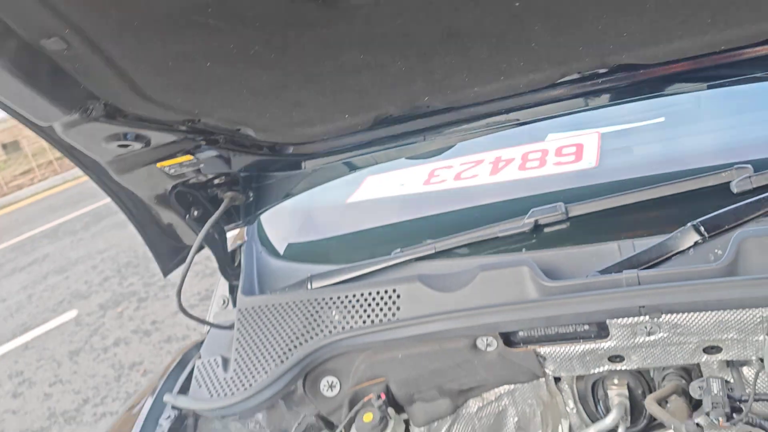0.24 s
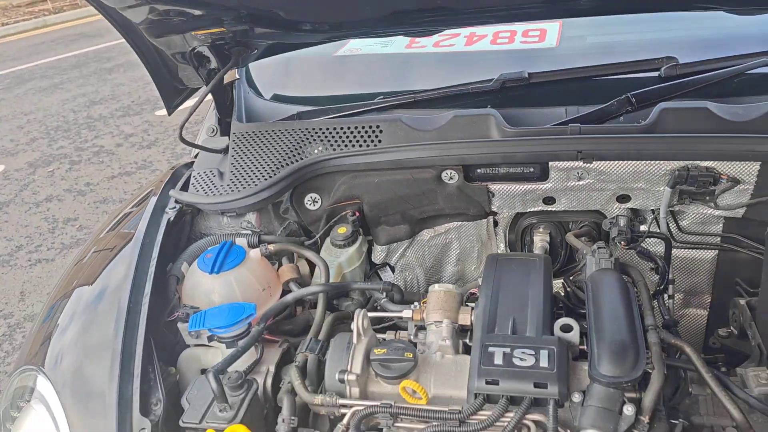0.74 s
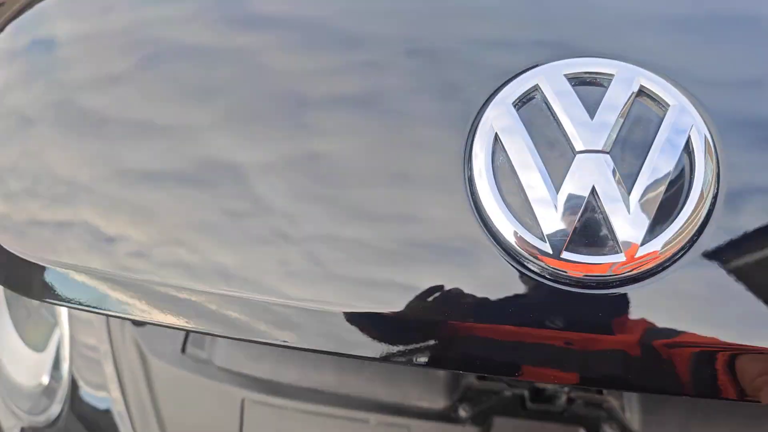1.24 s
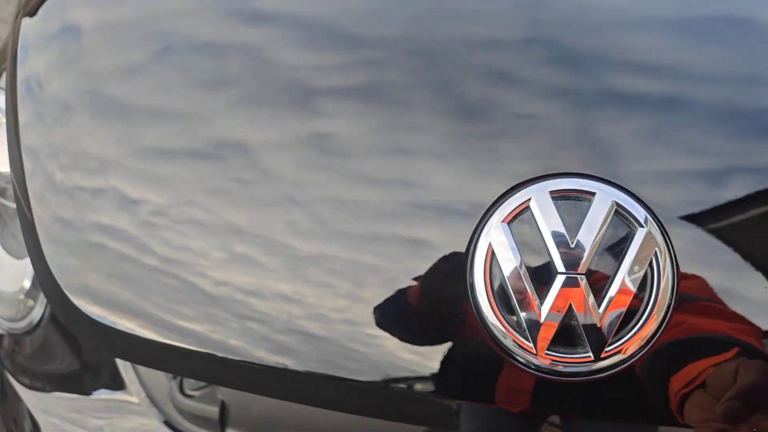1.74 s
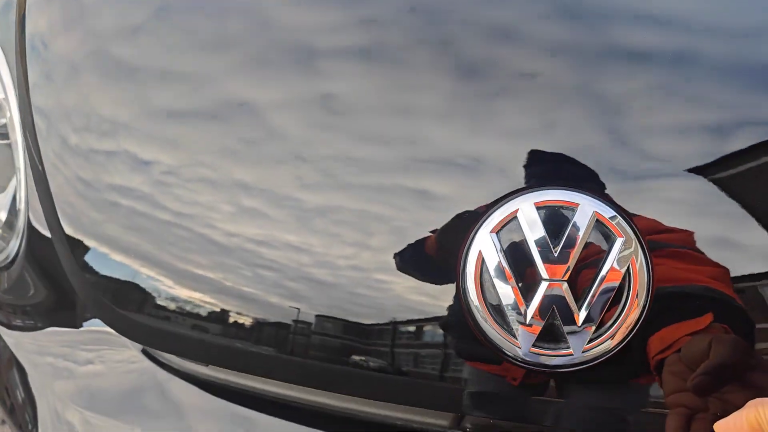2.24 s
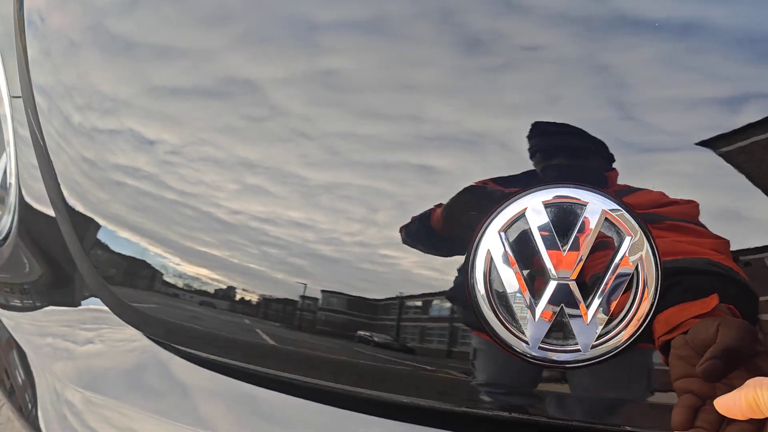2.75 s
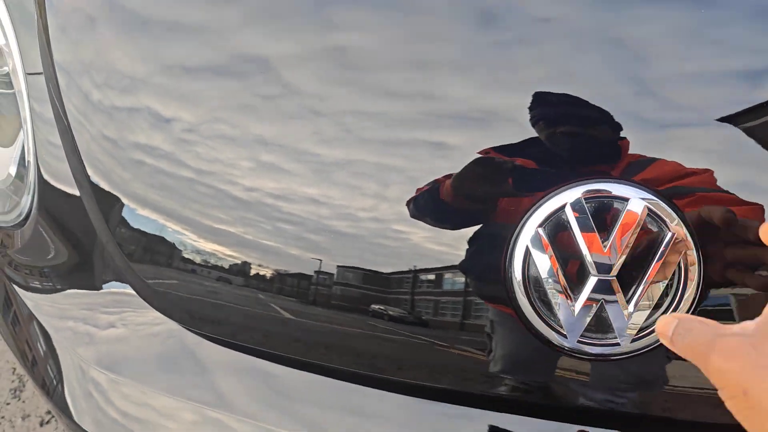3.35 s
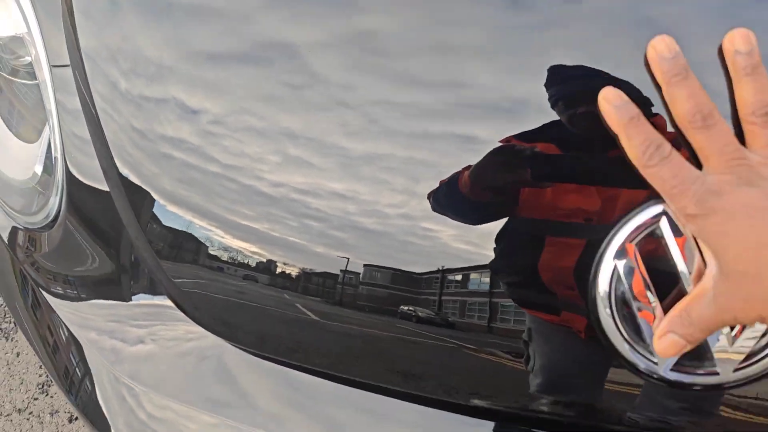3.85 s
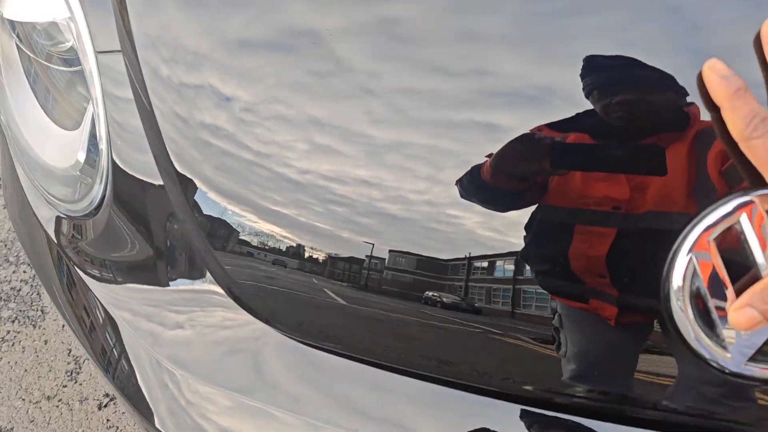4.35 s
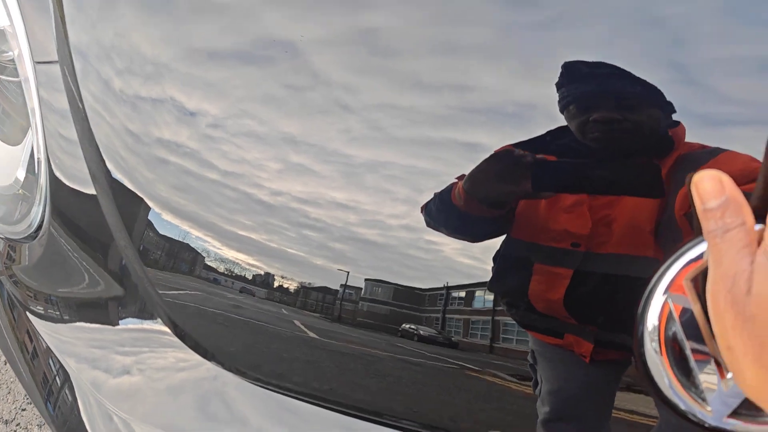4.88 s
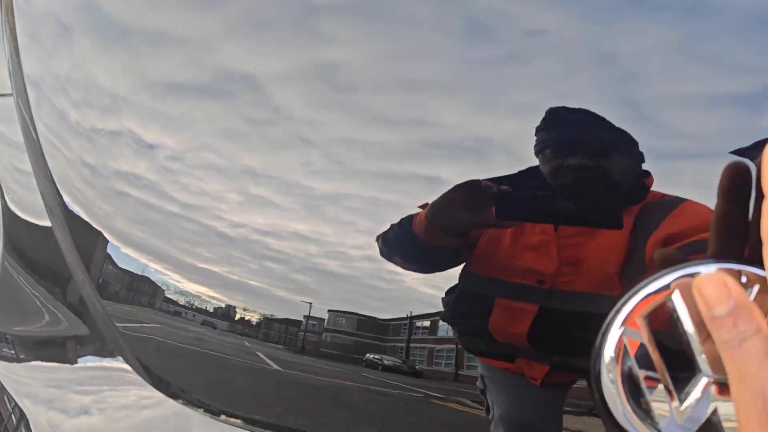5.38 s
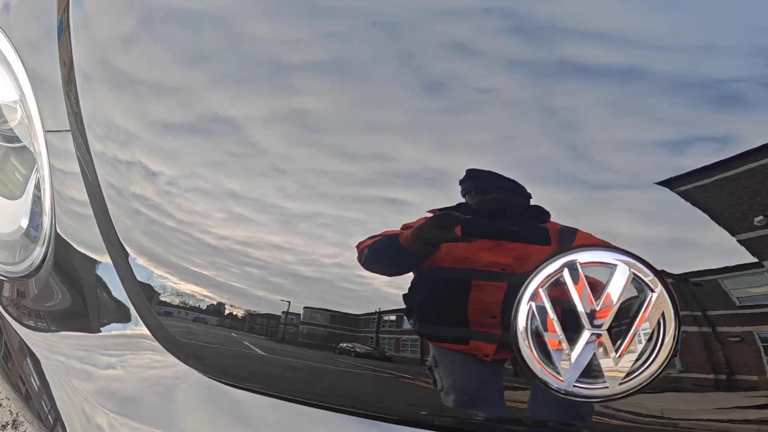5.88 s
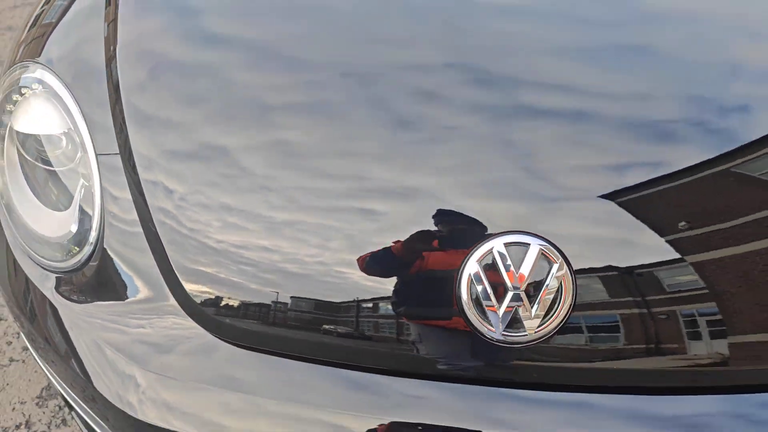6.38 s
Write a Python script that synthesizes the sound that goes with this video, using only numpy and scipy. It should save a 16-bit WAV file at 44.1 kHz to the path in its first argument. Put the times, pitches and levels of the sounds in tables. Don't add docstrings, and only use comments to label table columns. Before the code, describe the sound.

A petrol engine ticks and hisses at idle, then dulls as the bonnet comes down, slams on its catch and is pushed shut with two booming thumps.

```python
import sys
import numpy as np
from scipy import signal
from scipy.fft import rfft, irfft, next_fast_len
from scipy.io import wavfile
from scipy.ndimage import uniform_filter1d

SR = 44100
rng = np.random.default_rng(int(sys.argv[2]) if len(sys.argv) > 2 else 0)


def gain_from_db(level_db):
    decades = np.asarray(level_db, float) / 20
    return 10 ** decades


def to_wav(sig):
    pcm = np.clip(np.atleast_2d(sig), -1, 1) * 32767
    pcm = np.round(pcm).astype(np.int16)
    wavfile.write(sys.argv[1], SR, pcm.T)


N = 291942
SIZE = next_fast_len(N)
T = np.arange(N) / SR
HZ = np.fft.rfftfreq(SIZE, 1 / SR) + 1
SIDES = np.array([[1], [-1]])
FIRINGS_PER_S = 21.6


def unit(x):
    return x / np.sqrt(np.mean(x ** 2))


def follow(points):
    return np.interp(T, *np.transpose(points))


def along(points):
    hz, value = np.transpose(points)
    return np.interp(np.log(HZ), np.log(hz), value)


def high_pass(x, order, hz):
    return signal.sosfilt(signal.butter(order, hz, "high", fs=SR, output="sos"), x)


def band_pass(x, order, edges_hz):
    return signal.sosfilt(signal.butter(order, edges_hz, "band", fs=SR, output="sos"), x)


# [f/Hz, likeness 0-1]
LIKENESS = [(60, 1), (130, 0.85), (290, 0.88), (640, 0.78), (1410, 0), (3100, 0.05), (6820, 0), (15000, 0)]
# [f/Hz, left minus right level/dB]
LEAN = [(60, -5), (110, 2.5), (200, -2), (380, -3), (700, 3), (1290, 6), (2380, 5), (4400, 0.5), (8120, 0),
        (15000, 6)]


def noise():
    like = np.clip(along(LIKENESS), 0, 1)
    mid, side = rfft(rng.standard_normal((2, SIZE)))
    mid = mid * np.sqrt(1 + like)
    side = side * np.sqrt(1 - like)
    lean = gain_from_db(along(LEAN) / 2)
    return irfft(np.array([(mid + side) * lean, (mid - side) / lean]), SIZE)[:, :N] / 2


def colour(x, points):
    return unit(irfft(rfft(x, SIZE) * gain_from_db(along(points)), SIZE)[:, :N])


def ring(x, hz, width_hz):
    return signal.lfilter(*signal.iirpeak(hz, hz / width_hz, SR), x)


def walk(rate):
    k = int(SR / rate)
    steps = np.repeat(rng.standard_normal(N // k + 1), k)
    return 2.2 * uniform_filter1d(uniform_filter1d(steps, k), k)[:N]


def spell(start, full, fading, end, db):
    return gain_from_db(db) * np.interp(T, np.sort([start, full, fading, end]), [0, 1, 1, 0])


def ports(x):
    return np.array([np.roll(x, 7), x])


def struck(modes, t, factor, push_s):
    hz, db, t60 = np.transpose(modes)[:, :, None]
    loudness, pitch, phase = rng.standard_normal((3, len(modes), 1))
    fade = gain_from_db(db + 2.53 * loudness - 60 * t / (t60 * factor))
    tone = fade * np.sin(2 * np.pi * hz * (1 + 0.0084 * pitch) * t + 0.5 * phase)
    sound = tone.sum(axis=0) * (1 - np.exp(-(t / push_s) ** 2))
    return -sound / np.abs(sound).max()


# [f/Hz, level/dB per Hz]
ROAD_COLOUR = [(15, -67), (25, -9), (60, -21), (91, -8), (163, -7.5), (261, -3.5), (348, -15.5), (437, -17),
               (549, 1.5), (768, -7.5), (841, -7.5), (908, -5.5), (950, -13.5), (1240, -41), (2090, -120)]
# [t/s, level/dB]
LULL = [(0, 2.5), (0.3, 2.5), (0.72, -4), (1.2, -0.5), (1.66, -5.5), (2.1, -2.5), (2.5, -2.5), (3.5, -10),
        (3.9, -9), (4.9, -14), (5.86, -13), (6.25, -20.5), (6.62, -16.5)]
# [level/dB, share of the lull, swell/dB]
ROAD = [
    (-55.5, 0.3, 0.9),
    (-49, 1.05, 0.7),
    (-50, 0.8, 0.7),
]


def traffic():
    lull_db = follow(LULL)
    wash = colour(noise(), ROAD_COLOUR)
    out = 0
    for edges_hz, (db, share, swell_db) in zip([(20, 140), (140, 420), (420, 900)], ROAD):
        band = unit(band_pass(wash, 3, edges_hz))
        out = out + band * gain_from_db(db + share * lull_db + swell_db * walk(4) + 3.0 + 0.8 * walk(11))
    pan_db = -0.5 + 1.2 * walk(3.23)
    return out * gain_from_db(pan_db / 2 * SIDES)


# [f/Hz, level/dB per Hz]
BAY_OPEN = [(470, -25), (800, -5.5), (895, -35), (988, -2), (1820, -8), (2110, -9.5), (2570, -8.5),
            (4080, -7), (6950, -11), (7880, -9), (9730, -13), (12900, -7), (15600, -17.5)]
# [f/Hz, level/dB per Hz]
BAY_SHUT = [(470, -41), (800, -41), (988, 4), (1820, -1), (2010, 1), (3640, -18.5), (4340, -16),
            (5490, -27), (7880, -25), (9610, -34), (10900, -29), (12800, -29.5), (15600, -30)]
# [f/Hz, width/Hz, open level/dB, shut level/dB]
DUCTS = [(521, 34, -20.5, -5.5), (1289, 14, -21.5, -16), (1750, 160, -21, -34.5), (2055, 220, -39, -10),
         (2423, 16, -14, -12), (3035, 460, -12.5, -6.5)]


def hiss(firings, gap, shade_db, tick_db):
    air = noise()
    rush = gap * colour(air, BAY_OPEN) + (1 - gap) * colour(air, BAY_SHUT)
    body = signal.sosfiltfilt(signal.butter(3, 3500, fs=SR, output="sos"), rush)
    fizz = rush - body
    fizz = fizz / np.sqrt(uniform_filter1d(np.mean(fizz ** 2, axis=0), SR // 4))
    body = body / np.sqrt(uniform_filter1d(np.mean(body ** 2, axis=0), SR // 4))
    fizz = fizz * gain_from_db(1.3 * np.cos(2 * np.pi * (firings - .12)) + 2.3 * walk(110) - 0.6)
    for hz, width_hz, open_db, shut_db in DUCTS:
        duct_db = shut_db + gap * (open_db - shut_db) + 2.2 * walk(6)
        body = body + gain_from_db(duct_db) * unit(ring(noise(), hz, width_hz))
    leak_db = -51.5 + np.where(T > 5.28, -6, 0) + 1.14 * walk(3.586)
    loud = np.hypot(gain_from_db(-38.5 + shade_db), gain_from_db(leak_db))
    pulse_db = 0.84 * walk(13) + 0.5 * np.cos(2 * np.pi * (firings - .42))
    return body * loud * gain_from_db(pulse_db) + fizz * gain_from_db(tick_db - 2.2)


# [start t/s, full t/s, fading t/s, end t/s, level/dB]
WHINES = [
    (0.06, 0.19, 0.95, 1.16, -31.5),
    (0.38, 0.477, 0.42, 1.1, -34.5),
    (1.217, 1.297, 1.33, 1.46, -39),
    (4.203, 4.367, 5.2, 5.3, -54),
]


def belt_whine(gap):
    whine_hz = 983
    song = gain_from_db(-56.5 + 1.5 * walk(5)) + sum(spell(*row) for row in WHINES)
    rough = unit(ring(ring(noise(), whine_hz, 75), whine_hz, 85))
    glide_hz = whine_hz + 40 * gap * np.clip(.95 - T, 0, 1) + 11 * walk(70)
    tone = np.sin(2 * np.pi * np.cumsum(glide_hz) / SR) * gain_from_db(0.8 + 1.5 * walk(25)) * gain_from_db(3.0 * SIDES)
    return (0.8 * rough + 1.5 * tone) * song * gain_from_db(-14.5)


# [part of the cycle, f/Hz, width/Hz, open level/dB, shut level/dB, t60/s, scatter/dB]
TICKS = [(0.868, 4170, 550, 6.5, 6, 0.04, 1.5), (0.873, 4480, 220, 2, 2, 0.038, -0.5),
         (0.845, 8800, 15500, 8, -6, 0.013, 1), (0.018, 7900, 1200, 1, -17, 0.023, 8.5),
         (0.205, 6270, 930, 4.5, -2, 0.054, 3), (0.224, 7920, 530, 2, -3, 0.026, 2),
         (0.202, 7800, 8200, 8, -12, 0.0094, 5), (0.34, 11950, 1900, 4.5, -5.5, 0.028, 3.5),
         (0.97, 8000, 16500, 6.5, -9, 0.014, 0), (0.47, 2010, 300, -3.5, 0.5, 0.092, 5),
         (0.438, 3390, 930, 1, -0.5, 0.046, 4)]
CYLINDER_DB = [0, 0.14, 0.56, 0.95]


def ticks(firings, gap):
    out = 0
    for place, hz, width_hz, open_db, shut_db, t60, scatter_db in TICKS:
        turn = firings + .016 * walk(25) - place + 4
        cycle = turn.astype(int)
        since = turn % 1 / FIRINGS_PER_S
        luck = np.clip(rng.standard_normal(200), -1.6, 1.0)[cycle]
        size_db = np.clip(scatter_db, 1, 3.5) * luck + np.array(CYLINDER_DB)[cycle % 4]
        metal = unit(ring(noise(), hz, width_hz))
        metal = metal / (uniform_filter1d(metal ** 2, int(SR / width_hz / 2) + 9) + .05) ** .4
        rise = 1 - np.exp(-since / (0.00022 + 0.68 / width_hz))
        burst = gain_from_db(size_db - 60 * since / t60) * rise * metal
        out = out + gain_from_db(shut_db + gap * (open_db - shut_db)) * unit(ring(burst, hz, 1.32 * width_hz))
    return out


# [part of the cycle, f/Hz, width/Hz, open level/dB, shut level/dB, length/s,
# every second firing level/dB]
COVERS = [
    (.23, 2180, 80, 4.5, 5.5, .026, -3),
    (.33, 1290, 60, 1, 7.5, .03, -9),
    (.3, 2450, 35, -7, -2, .036, -2.5),
]
# [f/Hz, from t/s, to t/s, gained level/dB]
GLIMPSES = [(2180, .08, .4, 2), (2180, .62, 1.05, 2.5), (2180, 1.65, 2.1, 7), (2180, 3.6, 4.0, 8),
            (1290, 0.0, .2, 4), (1290, .7, .97, 4), (1290, 1.3, 2.3, 4), (2450, 0.0, .25, 7),
            (2450, 1.22, 1.62, 11), (2450, 2.1, 2.4, 7), (2450, 4.4, 5.15, 6), (2450, 5.5, 5.7, 10),
            (2450, 6.5, 6.7, 12)]


def covers(firings, gap):
    out = 0
    for place, hz, width_hz, open_db, shut_db, length_s, odd_db in COVERS:
        turn = firings - place + 4
        cycle = turn.astype(int)
        since = turn % 1 / FIRINGS_PER_S
        size_db = odd_db * (cycle % 2) + rng.standard_normal(200)[cycle] + 0.8 * walk(3)
        seen = 1
        for cover_hz, a, b, db in GLIMPSES:
            if abs(cover_hz / hz - 1) < .05:
                seen = seen + spell(a - .05, a, b, b + .05, db) * (1 - gain_from_db(-db))
        gate = gain_from_db(size_db) * np.interp(since, [0, .002, length_s, length_s + .006], [0, 1, .6, 0])
        metal = unit(ring(noise(), hz, width_hz))
        metal = metal / (uniform_filter1d(metal ** 2, int(SR / width_hz / 2)) + .05) ** .45
        hum = unit(ring(gate * metal, hz, 2.45 * width_hz))
        out = out + gain_from_db(shut_db + gap * (open_db - shut_db)) * seen * hum
    return out


# [t/s, firings so far]
CRANK = [(0.0, 0.44), (0.6, 13.42), (1.8, 39.2), (2.55, 55.46), (3.3, 71.56), (4.8, 104.03), (5.4, 117.12),
         (6.62, 143.44)]
# [t/s, gap 0-1]
OPENING = [
    (0, 1),
    (1.0, 1),
    (1.3, 0.49),
    (1.6, 0.77),
    (2.5, 0.2),
    (3.1, 0.01),
    (6.62, 0.01),
]
# [t/s, level/dB]
SHADE = [(0, 0.95), (0.45, 1.3), (0.75, 1), (1.06, -1), (1.25, -6.5), (1.4, -12.5), (1.57, -15.5),
         (2.1, -18.5), (2.5, -18), (3.2, -21.5), (3.6, -19), (4.3, -23.5), (6.62, -21.5)]


def engine():
    shade_db = follow(SHADE)
    tick_db = -36.5 + shade_db
    gap = np.clip(follow(OPENING), 0, 1)
    firings = follow(CRANK)
    clatter = (ticks(firings, gap) + covers(firings, gap)) * gain_from_db(tick_db - 11.0)
    return hiss(firings, gap, shade_db, tick_db) + clatter + belt_whine(gap)


# [start t/s, full t/s, fading t/s, end t/s, level/dB]
SLEEVE = (5.77, 5.81, 5.9, 6.05, -51.5)
# [f/Hz, level/dB per Hz]
CLOTH = [(1470, -21), (2500, 2), (4270, -2), (5060, -1), (5630, 3), (8390, -6.5), (12900, 1), (15600, -3)]
# [start t/s, full t/s, fading t/s, end t/s, level/dB]
PALM = [
    (3.28, 3.39, 3.41, 3.45, -68),
    (3.5, 3.58, 3.6, 3.8, -64),
    (5.3, 5.36, 5.37, 5.41, -68),
    (5.57, 5.66, 5.71, 5.77, -59.5),
]


def sleeve_and_palm():
    cloth = colour(noise(), CLOTH) * uniform_filter1d(spell(*SLEEVE), 900)
    slide = uniform_filter1d(sum(spell(*row) for row in PALM), 900)
    skin = unit(ring(ring(noise(), 14000, 4000), 11000, 6300)) * slide * gain_from_db(3.5)
    return (cloth + skin) * gain_from_db(2.0 + 1.56 * walk(40))


# [t/s, pin level/dB, hook level/dB]
RAPS = [(2.5655, -44, -31), (2.9795, -27, -18), (2.9897, -20, -22), (3.0, -21, -17), (3.0044, -13, -2),
        (3.01, -3.5, -41), (3.0184, -14, -10), (3.031, -8, -30), (3.045, -24, -40), (3.054, -17, -40),
        (3.0707, -29, -42), (4.043, -30, -43), (4.0554, -13.5, -10), (4.0704, -20, -5), (4.075, -24, -30),
        (4.0935, -31, -25), (4.1164, -32, -27.5), (4.4341, -40, -54), (5.229, -28, -13.5),
        (5.2452, -14.5, -24), (5.2585, -15, -34), (5.269, -23, -45), (5.294, -23.5, -37), (2.572, -47, -34),
        (2.885, -45, -29), (5.343, -44, -40)]
# [f/Hz, level/dB, t60/s]
PIN = [(1490, -4, 0.055), (1543, 4, 0.047), (1685, -4, 0.056), (1883, -6.5, 0.042), (2400, -27, 0.025)]
# [f/Hz, level/dB, t60/s]
HOOK = [(777, 1.5, 0.052), (826, -8, 0.11)]


def catch():
    out = np.zeros((2, N))
    t = np.arange(4000) / SR
    for s, pin_db, hook_db in RAPS:
        pin = ports(struck(PIN, t, 0.94, 0.0033)) * gain_from_db(pin_db - 4.5 + 9 / 2 * SIDES)
        hook = ports(struck(HOOK, t, 1.0, 0.00039)) * gain_from_db(hook_db - 5.0 - 1.5 / 2 * SIDES)
        out[:, int(s * SR):int(s * SR) + len(t)] += pin + hook
    return out


# [t/s, boom level/dB, knock level/dB, ring time factor, boom tilt/dB per octave]
BLOWS = [(2.565, -8.5, -19, 0.65, -2), (2.623, -31, -32.5, 0.7, 15), (2.697, -28, -45, 1, -9),
         (2.843, -29, -41, 0.86, -0.5), (2.885, -26.5, -32, 1, 7), (2.969, -24.5, -27, 0.51, 10),
         (2.99, -10, -14, 0.56, -0.5), (3.002, -13, -7, 0.28, 4), (3.02, -24, -19, 0.91, 1.3),
         (3.03, -13.5, -14, 0.9, 7.5), (3.047, -36, -15.5, 0.41, -9), (3.084, -24.5, -27, 0.37, 12),
         (3.1106, -25, -21.5, 0.25, -1), (3.158, -31, -33, 0.3, 2), (4.054, -6, -18.5, 0.54, -3),
         (4.071, -5, -15.5, 0.47, 1.5), (4.101, -8, -20, 0.46, -1), (4.136, -16.5, -25, 0.59, 6.5),
         (4.169, -17, -57, 0.92, -1.5), (4.36, -17.5, -45.5, 0.45, 0.3), (4.426, -21.5, -36, 0.9, 0.5),
         (5.203, -14, -30.5, 0.59, 7), (5.229, -1.5, -22.5, 0.59, 1.1), (5.242, -12.5, -12.5, 0.78, 2),
         (5.262, -11, -16, 0.83, -1.5), (5.294, -10, -20.5, 0.71, 2.5), (5.341, -17, -22, 0.24, 6),
         (5.428, -25.5, -58, 0.74, -1.5), (5.56, -36, -93, 0.43, -9), (5.891, -35.5, -41.5, 0.37, 17.5)]
# [f/Hz, level/dB, t60/s]
PANEL = [(62, -5, 0.14), (85.3, 3, 0.43), (98.7, -1.5, 0.64), (122, -2, 0.74), (148, -13, 1),
         (164.1, 4, 0.37), (172.7, 1, 0.47), (186, 0, 0.46), (240.4, -8.5, 0.5), (278.7, -5.5, 0.42),
         (321.8, -7.5, 0.33), (363.7, -2.5, 0.22), (411.3, -12.5, 0.28), (170.6, -2.5, 0.11),
         (257, 5.5, 0.02)]
# [f/Hz, level/dB, t60/s]
FRAME = [(424, -3, 0.33), (495.8, -1.5, 0.33), (549.6, -3, 0.34), (597, -0.5, 0.23), (707, 1.5, 0.13),
         (756.6, -8.5, 0.24), (873, -13.5, 0.22), (970, -28, 0.05), (1082, -13, 0.11), (1187, -10, 0.21),
         (1378, -7.5, 0.12), (1730, -21, 0.32), (2120, -7.5, 0.036)]


def blows(seams, latch, t):
    out = np.zeros((2, N + SR))
    snap = (1 - np.exp(-t / 0.00022)) * (gain_from_db(-60 * t / 0.036) + gain_from_db(-8.0 - 60 * t / 0.068))
    for s, boom_db, knock_db, factor, tilt_db in BLOWS:
        span = slice(int(s * SR), int(s * SR) + len(t))
        panel = [(hz, db + tilt_db * np.log2(hz / 170), t60) for hz, db, t60 in PANEL]
        boom = struck(panel, t, factor, 0.0025) * gain_from_db(boom_db - 1.84)
        boom = boom + 0.051 * np.roll(boom, SR // 250) * SIDES
        knock = 0.58 * struck(FRAME, t, factor, 0.0021) + 0.15 * struck(FRAME, t, factor, 0.0013) * SIDES
        rattle = seams[:, span] * gain_from_db(-9.5 - 60 * t / (0.12 * factor)) * (1 - np.exp(-t / 0.00074))
        crack = latch[:, span] * snap * gain_from_db(knock_db - 34)
        pan_db = -2 + rng.standard_normal()
        out[:, span] += (boom + (knock + rattle) * gain_from_db(knock_db + 3.0) + crack) * gain_from_db(pan_db / 2 * SIDES)
    return out


# [t/s, level/dB, f/Hz of the ringing part, treble level/dB, t60/s]
CRACKS = [(2.5651, -19.5, 3960, 0, 0.037), (2.571, -32, 2400, -13, 0.038), (2.9785, -38, 2600, -20, .05),
          (2.989, -20, 2420, -1, 0.032), (2.9995, -25, 5200, 0, .05), (3.004, -19.5, 2900, -1, .04),
          (3.0096, -15, 5800, -1, .04), (3.0198, -19, 3970, -3, 0.04), (3.0295, -25, 2700, 2, 0.025),
          (3.0323, -19, 5760, 5.5, 0.033), (3.043, -22, 2550, -16, 0.049), (3.054, -20.5, 2300, -2, 0.022),
          (3.061, -28.5, 2530, -23, 0.047), (3.0707, -38, 2100, -26, 0.051), (3.11, -42, 2200, -12, .03),
          (4.0552, -40, 3000, -8, .05), (4.071, -33.5, 2300, 2, 0.033), (4.0741, -42, 2550, -8, .06),
          (4.083, -44, 1900, -18, 0.069), (4.0935, -45, 2720, -14, 0.069), (4.1164, -47, 1800, -10, 0.045),
          (4.135, -48, 1650, -16, .06), (5.229, -33, 6200, -2, .03), (5.24, -27, 2580, -21, 0.035),
          (5.2463, -18, 2180, -26, 0.044), (5.254, -28, 2400, 4, .02), (5.259, -12, 6630, 5.5, 0.022),
          (5.2616, -20, 2940, 1, 0.031), (5.27, -25, 2860, -16, .04), (5.2775, -32, 3040, -17, 0.091),
          (5.294, -35, 2820, -10, 0.069), (5.343, -43, 2500, -10, .04), (5.427, -41, 4400, -8, .02),
          (5.665, -42, 2400, -12, .02)]


def cracks(latch, t):
    out = np.zeros((2, N + SR))
    treble = signal.sosfiltfilt(signal.butter(2, 5000, "high", fs=SR, output="sos"), latch)
    for s, crack_db, hz, treble_db, t60 in CRACKS:
        span = slice(int(s * SR), int(s * SR) + len(t))
        part = 1.5 * gain_from_db(-9) * ports(np.sin(2 * np.pi * hz * t))
        fade = (1 - np.exp(-t / 0.00018)) * (gain_from_db(-60 * t / t60) + gain_from_db(-17 - 60 * t / (1.8 * t60)))
        grit = latch[:, span] + (gain_from_db(treble_db) - 1) * treble[:, span]
        out[:, span] += (grit + part) * fade * gain_from_db(crack_db - 1.5)
    return out


# [f/Hz, width/Hz, level/dB]
LATCH = [(2160, 1060, 17.5), (2750, 330, -5.5), (4300, 1700, 1), (5820, 200, 3.5), (7350, 200, -4.5),
         (11200, 5900, -2.5)]


def bonnet():
    t = np.arange(int(.55 * SR)) / SR
    grit = 0.88 * noise() + 0.38 * ports(rng.standard_normal(N))
    latch = sum(gain_from_db(db) * unit(ring(grit, hz, width_hz)) for hz, width_hz, db in LATCH)
    latch = unit(latch + 0.5 * ring(grit, 4600, 9000))
    seams = unit(band_pass(grit, 2, [300, 1200]))
    out = blows(seams, latch, t) + cracks(latch, t)
    return high_pass(out[:, :N], 3, 62)


def scene():
    return traffic() + engine() + sleeve_and_palm() + catch() + bonnet()


# [f/Hz, level/dB]
HOUSING = [(20, -0.55), (8600, -0.26), (9700, -3), (10600, -0.05), (14000, -1.7), (15500, -2), (20000, -7)]


def low_pass(x):
    return signal.sosfilt(signal.butter(12, 16030, fs=SR, output="sos"), x)


def record(dry):
    x = high_pass(np.tanh(0.79 * dry) / 0.81, 3, 58)
    x = irfft(rfft(x, SIZE) * gain_from_db(along(HOUSING)), SIZE)[:, :N]
    x = x - 0.48 * ring(x, 6870, 152) - 0.98 * ring(x, 9870, 250)
    x = signal.sosfilt(signal.ellip(8, .3, 60, 15800, fs=SR, output="sos"), x)
    return low_pass(x)


dry = scene()
out = record(dry)
to_wav(out)
```